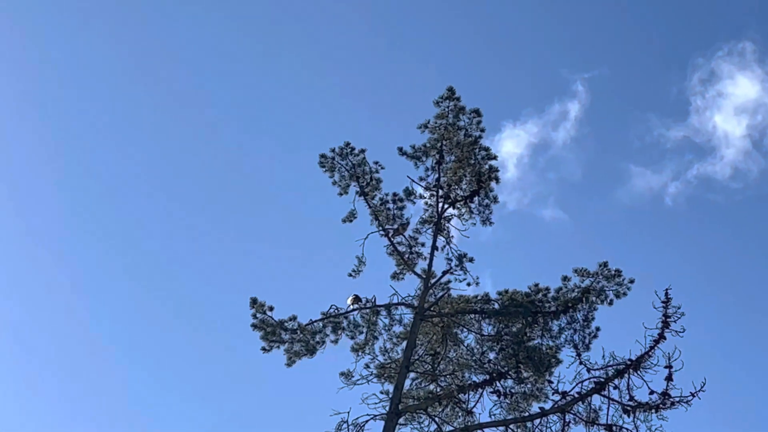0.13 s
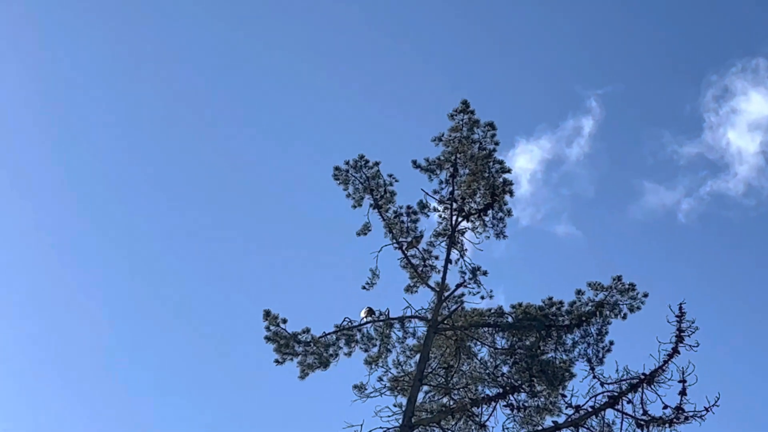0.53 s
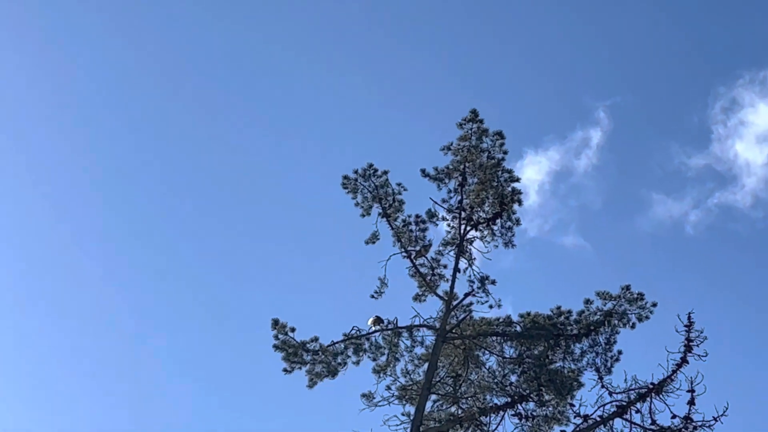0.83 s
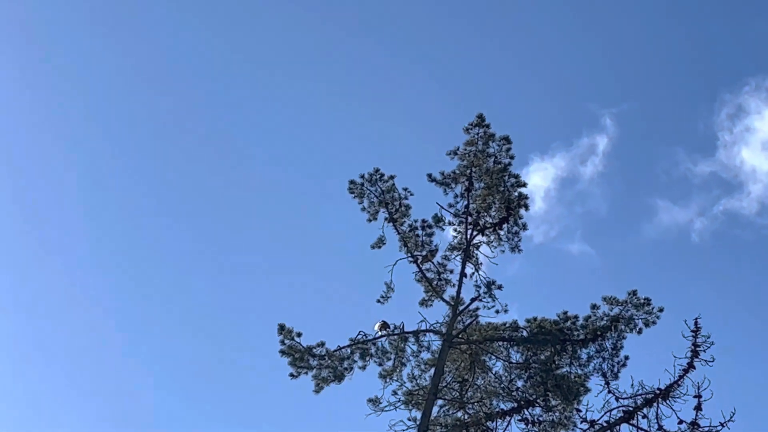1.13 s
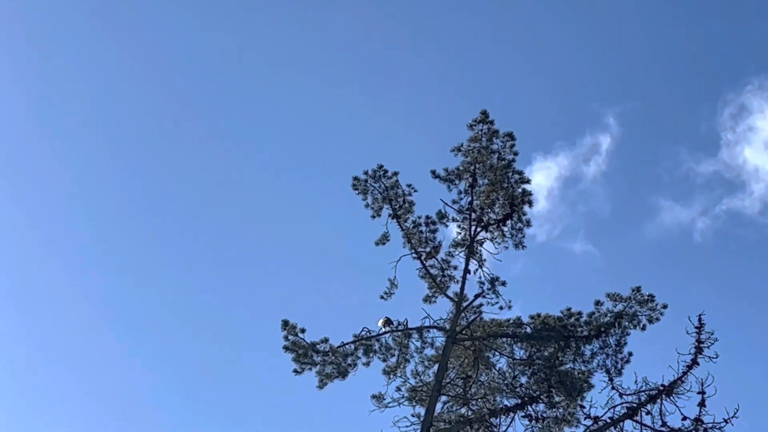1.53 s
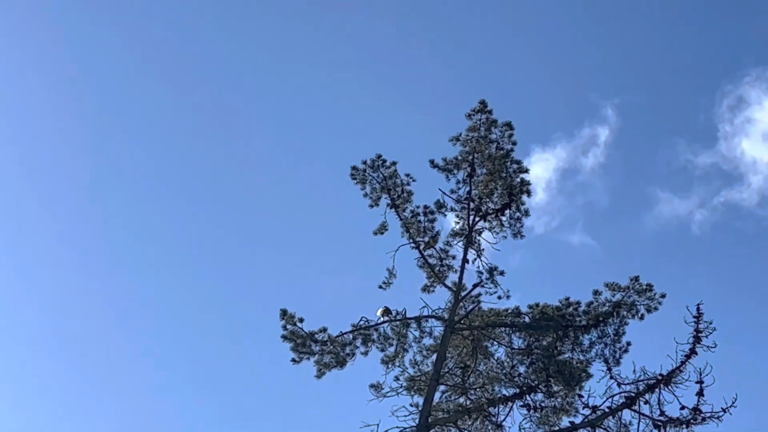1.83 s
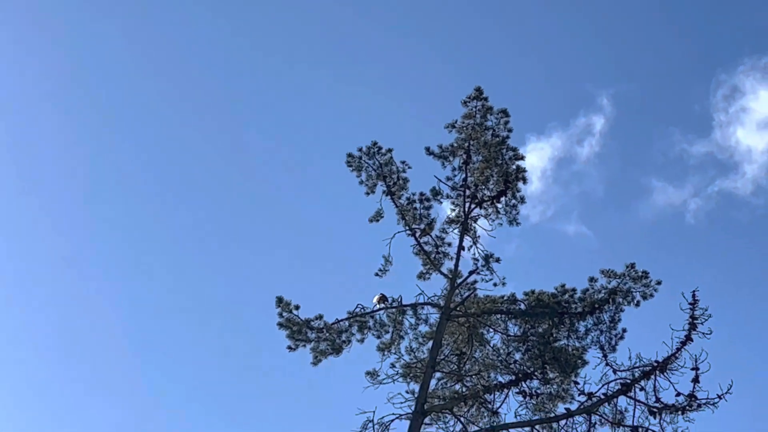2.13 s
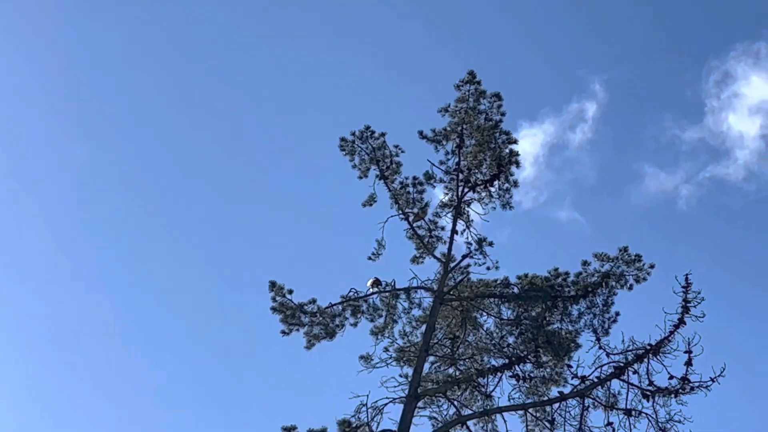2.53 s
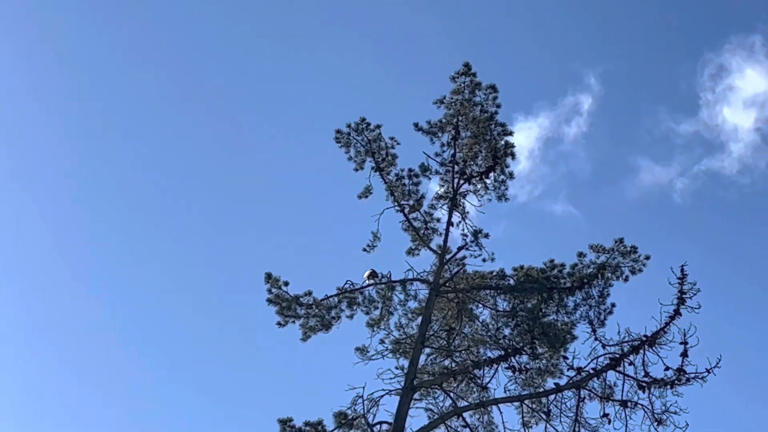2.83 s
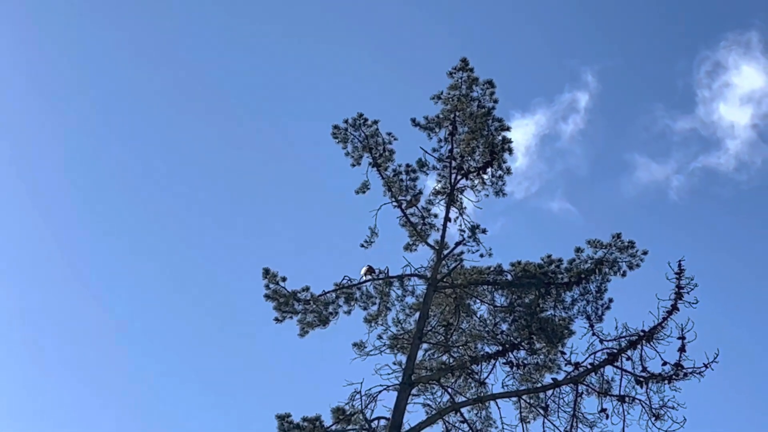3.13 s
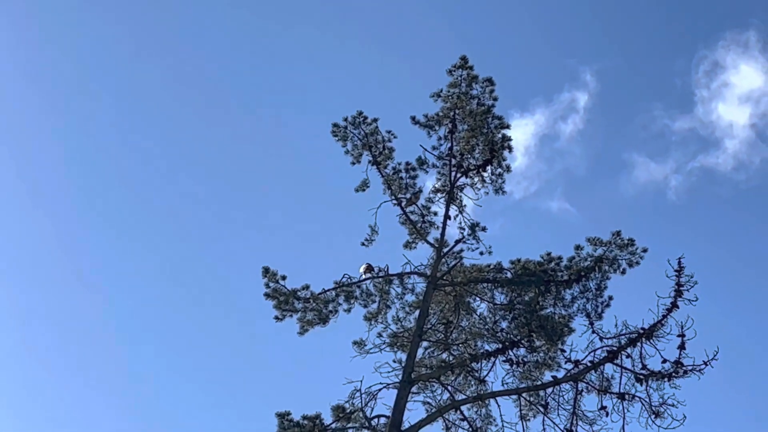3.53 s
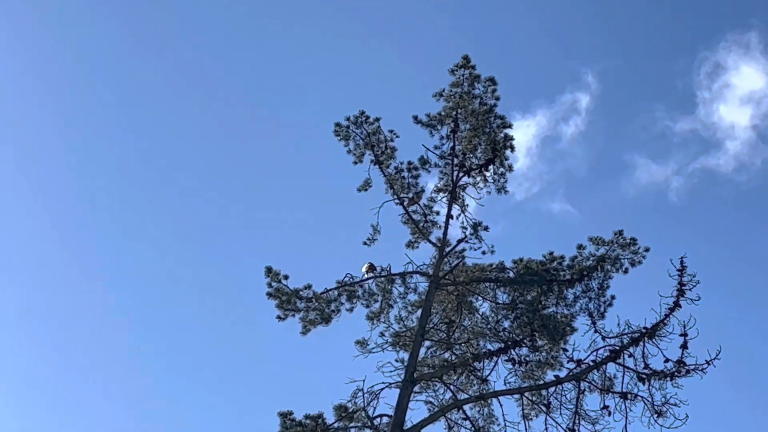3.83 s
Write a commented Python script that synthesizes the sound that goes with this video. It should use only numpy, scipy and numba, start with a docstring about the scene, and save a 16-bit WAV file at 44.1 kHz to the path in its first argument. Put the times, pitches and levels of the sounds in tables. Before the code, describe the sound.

A hawk high in a tree gives one long hoarse scream, rising sharply, breaking, then holding a rasping, slowly sagging tone. Low outdoor rumble and faint microphone hiss surround it; a short diffuse echo follows.

```python
"""Hawk scream from a high branch

A hawk slightly to the right gives one long hoarse scream: it shoots up, breaks and sags.
Its unsteady sine whistle is chopped by a slower flutter and buried in rasp, random clicks ringing in
resonances; short reflections and a diffuse tree echo answer it. Filtered noise makes the low outdoor
rumble with a few droning resonances, and the thin microphone hiss."""
import sys
import numpy as np
from scipy import signal
from scipy.fft import rfft, irfft
from scipy.io import wavfile
from scipy.ndimage import uniform_filter1d
from numba import njit

SR = 44100
rng = np.random.default_rng(int(sys.argv[2]) if len(sys.argv) > 2 else 0)


def put_to_file(sound):
    """Save the sound as 16-bit audio at rate SR, in the file named by the first command-line argument."""
    columns = np.atleast_2d(sound).T  # one column per channel
    safe = np.clip(columns, -1, 1)
    whole_steps = np.round(safe * 32767)
    wavfile.write(sys.argv[1], SR, whole_steps.astype(np.int16))


N = 176400  # samples, 4 s


def undb(db):
    """dB to gain."""
    return 10 ** (np.asarray(db) / 20)


def level(x, db):
    """Scale to an rms level over the whole length."""
    return x * undb(db) / np.sqrt(np.mean(x ** 2))


def follow(t, table, **ends):
    """Read a two-column curve at the times t, in straight lines between its points."""
    return np.interp(t, *np.array(table, float).T, **ends)


@njit
def svf(x, hz, width):
    """State-variable band-pass whose centre may move, gain 1 at the centre."""
    y, band_state, low_state = np.empty(len(x)), 0., 0.
    for i in range(len(x)):
        g, k = np.tan(np.pi * hz[i] / SR), width / hz[i]
        v = (band_state + g * (x[i] - low_state)) / (1 + g * (g + k))
        band_state = 2 * v - band_state
        low_state += 2 * g * v
        y[i] = k * v
    return y


def band(x, hz, width):
    """A steep resonance: the band-pass twice."""
    hz = hz + np.zeros(N)
    once = svf(x, hz, 1. * width)
    return svf(once, hz, 1. * width)


def colour(x, points):
    """Equalise a sound by (pitch_hz, level_db) points, joined on a log frequency axis."""
    hz, db = np.array(points, float).T
    bins_hz = np.arange(N // 2 + 1) * SR / N
    gain = undb(np.interp(np.log(bins_hz + 1), np.log(hz), db))  # + 1 avoids log 0
    return irfft(rfft(x) * gain, N)


def walk(rate):
    """Random wander with rms 1: noise smoothed twice over 1 / rate seconds."""
    k = max(int(SR / rate), 2)
    smooth = uniform_filter1d(uniform_filter1d(rng.standard_normal(N), k), k)
    return level(smooth, 0)


def turn(hz):
    """Phase in radians of a tone with moving pitch."""
    return 2 * np.pi * np.cumsum(hz) / SR


def left_right(mid, side):
    """Centre and side signals to a stereo pair."""
    return np.array([mid + side, mid - side])


HISS_HZ, HISS_WIDTH_HZ = 11060, 6000
HISS_DB, HISS_SIDE_DB = -95, -1.5  # centre level; side relative to centre


def hiss():
    """Thin high hiss of the microphone: a broad band of noise, separate in centre and side."""
    mid, side = (level(band(rng.standard_normal(N), HISS_HZ, HISS_WIDTH_HZ), HISS_DB + db)
                 for db in (0, HISS_SIDE_DB))
    return left_right(mid, side)


# droning resonances: pitch_hz, width_hz, level_db (before waver and swell)
DRONES = [(69, 21, -62.5), (83.6, 4.5, -64.5), (125.26, 9.7, -62), (206.1, 24, -59.5), (229.4, 18, -64),
          (319.3, 11, -66), (441.8, 30, -74)]
# swell of the drones together: time_s, level_db
DRONE_SWELL = [(0, 2), (.6, -2), (1.1, -1.5), (1.75, 7), (2.2, -3.5), (2.9, 2), (3.5, 0), (4, 4.5)]


def drones(t):
    """Narrow noise resonances that waver each on its own and swell together."""
    total = 0
    for hz, width, db in DRONES:
        drone = level(band(rng.standard_normal(N), hz, width), db)
        total = total + drone * undb(2.9 * walk(5.2))
    return total * undb(follow(t, DRONE_SWELL))


# spectral slope of the rumble, centre and side: pitch_hz, level_db (relative)
RUMBLE_MID = [(12, -62.5), (20, -18), (69, 1.5), (134, -9), (163, -10.5), (203, -3), (253, -8),
              (286, -15.5), (323, -12), (374, -20), (444, -28), (478, -27.5), (723, -31.5), (1240, -43),
              (6830, -63), (8880, -80), (15000, -120)]
RUMBLE_SIDE = [(12, -52), (20, -15), (54, 2), (184, -5.5), (219, -2.5), (403, -8), (433, -14), (553, -14),
               (1580, -21), (3200, -58.5), (6830, -42), (8880, -72), (15000, -120)]
# slow level of the centre rumble: time_s, level_db
GUST = [(0, 1), (.6, -0.5), (1.7, 0.5), (2.6, 0), (4, -0.5)]
RUMBLE_DB, RUMBLE_SIDE_DB = -49.5, -66.5  # centre before its slow level curve
FAR_HZ, FAR_WIDTH_HZ, FAR_DB = 1700, 410, -87


def rumble(t):
    """Broad low noise and a soft distant wash with the drones in the centre, steady noise at the side."""
    broad = level(colour(rng.standard_normal(N), RUMBLE_MID), RUMBLE_DB) * undb(follow(t, GUST))
    wash = level(band(rng.standard_normal(N), FAR_HZ, FAR_WIDTH_HZ), FAR_DB)
    side = level(colour(rng.standard_normal(N), RUMBLE_SIDE), RUMBLE_SIDE_DB)
    return left_right(broad + wash + drones(t), side)


# colour of the echo, centre and side: pitch_hz, level_db
ECHO_MID = [(500, -4), (1800, -7), (2100, -7), (2400, -3), (3000, -5), (3700, -5), (4500, 3), (7000, -3)]
ECHO_SIDE = [(500, 1.5), (1700, -2), (2500, -9), (3300, -5.5), (3800, -34.5), (5000, -32.5), (5500, -1),
             (7000, 5)]
ECHO_DB, ECHO_DELAY_S = -4, 0.017  # level before colouring
ECHO_T60_S, ECHO_TREBLE_T60_S, ECHO_SPLIT_HZ = 0.76, 0.48, 3600  # time to fall 60 dB, below and above the split
ECHO_CURVE = 1.5  # above 1 the echo holds, then falls ever faster
LEAF_DEPTH, LEAF_PER_S = .9, 200


def trees(bird):
    """Diffuse echo: the scream, smeared by moving needles, convolved with fading noise whose treble dies first."""
    t = np.arange(SR) / SR
    smeared = bird * (1 + LEAF_DEPTH * walk(LEAF_PER_S)) / np.hypot(1, LEAF_DEPTH)

    def fade(t60):
        return np.exp(-np.log(1000) * (t / t60) ** ECHO_CURVE) * (t > ECHO_DELAY_S)

    noise = rng.standard_normal((2, SR))
    dull = signal.sosfilt(signal.butter(4, ECHO_SPLIT_HZ, fs=SR, output="sos"), noise)
    tail = dull * fade(ECHO_T60_S) + (noise - dull) * fade(ECHO_TREBLE_T60_S)
    tail = tail / np.sqrt((tail ** 2).sum(axis=1)[:, None])
    mid, side = undb(ECHO_DB) * signal.fftconvolve(smeared[None], tail, axes=1)[:, :N]
    return left_right(colour(mid, ECHO_MID), colour(side, ECHO_SIDE))


# early reflections from ground and trunk: delay_ms, level_db
BOUNCES = [(3.1, -14), (4.3, -15), (8.24, -8), (11.3, -14), (12.07, -11)]


def reflections(bird):
    """Single delayed copies of the scream."""
    return sum(undb(db) * np.roll(bird, round(ms * SR / 1000)) for ms, db in BOUNCES)


# side share of the direct scream and its reflections, toward the right: pitch_hz, level_db
ASIDE = [(500, -30), (900, -16), (1400, -1.5), (2150, -3.5), (2600, -19), (3400, -26.5), (4200, -40),
         (5000, -40.5), (5600, -8), (8000, -27)]
SIDE_LAG = 3  # samples, between the microphone ports


def place(near):
    """Lean the near sound to the right with a coloured, slightly late side signal."""
    side = np.roll(colour(near, ASIDE), SIDE_LAG)
    return left_right(near, -side)


RASP_PER_S, RASP_SCATTER_DB = 9000, 2


def clicks():
    """Dense irregular clicks of either sign and scattered strength."""
    hits = rng.random(N) < RASP_PER_S / SR
    strength = undb(RASP_SCATTER_DB * rng.standard_normal(N))
    return hits * strength * rng.choice([-1., 1.], N)


def ring(resonances):
    """Rasp: clicks ringing in (pitch_hz, width_hz, relative level_db) resonances, rms 1 in all."""
    return level(sum(undb(db) * level(band(clicks(), hz, width), 0) for hz, width, db in resonances), 0)


SHRILL_DB, SHRILL_HZ, SHRILL_S, SHRILL_LENGTH_S = -79, 10000, 0.822, 0.057


def shrill_rasp(t):
    """A brief puff of very high rasp, peaking at SHRILL_DB."""
    puff = np.exp(-((t - SHRILL_S) / SHRILL_LENGTH_S) ** 2)
    return undb(SHRILL_DB) * puff * ring([(SHRILL_HZ, 2500, 0)])


UNDER_S, UNDER_LENGTH_S, UNDER_DB = .885, .09, -63.5  # start, length, peak amplitude
UNDER_FIRST_HZ, UNDER_LAST_HZ = 1033, 833
UNDER_TAIL_DB, UNDER_TAIL_S = -71, 0.17  # tail level before its fade, fade time constant


def undertone(t, ragged_hz):
    """A brief low falling sine at the break; a rasp tail slides on faintly below the pitch."""
    u = np.clip((t - UNDER_S) / UNDER_LENGTH_S, 0, 1)
    hz = (UNDER_FIRST_HZ + (UNDER_LAST_HZ - UNDER_FIRST_HZ) * u) * (1 + 0.0071 * walk(100))
    tone = undb(UNDER_DB) * np.sin(np.pi * np.sqrt(u)) * np.sin(turn(hz))
    late = t - UNDER_S - UNDER_LENGTH_S / 2
    fade = np.clip(late / 0.018, 0, 1) * np.exp(-np.maximum(late, 0) / UNDER_TAIL_S)
    return tone + undb(UNDER_TAIL_DB) * fade * ring([(0.32 * ragged_hz, 60, 0)])


# rasp at thirds of the pitch: thirds, width_hz, level_db (relative)
THIRDS = [(1, 650, 1), (2, 200, -2)]
# level of the low rasp: time_s, level_db
LOW_RASP = [(.73, -75.5), (.765, -62), (.84, -84.5), (.9, -75.5), (1.0, -72.5), (1.8, -70.5), (2.7, -75)]


def low_rasp(t, hz):
    """Rasp ringing at one and two thirds of the whistle pitch."""
    return undb(follow(t, LOW_RASP)) * ring([(k * hz / 3, width, db) for k, width, db in THIRDS])


# higher strand that arches with the pitch while the scream opens: time_s, pitch_hz, level_db
STRAND = [(.76, 4580, -90), (.79, 5020, -64), (.83, 5800, -57.5), (.86, 5360, -65.5), (.885, 4740, -66.5),
          (.93, 4600, -90)]


def high_strand(t):
    """A narrow rasp resonance that arches above the opening scream."""
    s, points_hz, points_db = np.array(STRAND, float).T
    gain = undb(np.interp(t, s, points_db, -150, -150))
    return gain * ring([(np.interp(t, s, points_hz), 350, 0)])


# level of the windpipe resonance: time_s, level_db
HELD = [(.738, -63.5), (.76, -56), (.8, -68.5), (.86, -65), (.9, -59.5), (.96, -56.5), (1.03, -61),
        (1.09, -72)]
HELD_HZ, HELD_WIDTH_HZ = 2410, 170


def held_windpipe(t):
    """A windpipe resonance that holds its pitch under the arch and the break."""
    return undb(follow(t, HELD, right=-150)) * ring([(HELD_HZ, HELD_WIDTH_HZ, 0)])


OPEN_HZ, OPEN_WIDTH_HZ, OPEN_DB = 3800, 200, -68  # level at full opening


def open_beak(wide):
    """A resonance heard while the beak is wide open."""
    return undb(OPEN_DB) * wide * ring([(OPEN_HZ, OPEN_WIDTH_HZ, 0)])


# overtone resonances gliding through the scream: start_hz, end_hz, width_hz, level_db (relative)
BEAK = [(4955, 4480, 860, 2.5), (4030, 4700, 1200, -5.5), (5790, 6100, 500, -8.5), (6800, 4400, 540, -15)]
OPEN_DUCK_DB = -7  # these are weaker while the beak is wide open
OVERTONE_WIDTH_HZ = 1800


def overtones(t, hz, span, wide):
    """Rasp in gliding beak resonances, plus rasp following the pitch from above."""
    gliding = [(np.interp(t, span, [first, last]), width, db) for first, last, width, db in BEAK]
    beak = undb(OPEN_DUCK_DB * wide) * ring(gliding)
    return beak + undb(-6.5) * ring([(1.32 * hz, OVERTONE_WIDTH_HZ, -2), (1.8 * hz, 600, -8)])


# resonances of windpipe and beak: pitch_hz, width_hz, level_db (relative)
THROAT = [(2417, 110, -2.5), (2529, 130, -3.5), (2663, 140, -8), (2917, 464, -5)]
THROAT_WANDER, THROAT_WANDER_PER_S = .012, 12  # rms share of the pitch, rate
GLIDE_WIDTH_HZ, GLIDE_DB = 740, -3.5


def throat_rasp(hz):
    """Rasp in throat resonances that wander a little, and gathered round the gliding pitch."""
    throat = [(f * (1 + THROAT_WANDER * walk(THROAT_WANDER_PER_S)), width, db) for f, width, db in THROAT]
    return ring(throat + [(0.953 * hz, GLIDE_WIDTH_HZ, GLIDE_DB)])


WOBBLE_SHARE, WOBBLE_PER_S = .014, 200  # rms share of the pitch, rate
HOARSE_WIDTH_HZ, PURE_DB = 200, -5  # PURE_DB: middle level of the sine against the hoarse band


def breathy_whistle(ragged_hz):
    """An unsteady sine with a hoarse band of rasp at the same pitch."""
    sine = np.sin(turn(ragged_hz * (1 + WOBBLE_SHARE * walk(WOBBLE_PER_S))))
    pure = np.sqrt(2) * undb(PURE_DB + 2.5 * walk(90)) * sine
    return pure + ring([(ragged_hz, HOARSE_WIDTH_HZ, 0)])


FLUTTER_HZ, FLUTTER_JITTER, FLUTTER_DEPTH = 404.3, 0.12, 0.45  # mean rate, rms share of rate, depth


def throat_flutter():
    """An irregular fast tremolo that chops the voice."""
    return 1 + FLUTTER_DEPTH * np.cos(turn(FLUTTER_HZ * (1 + FLUTTER_JITTER * walk(57.9))))


# the scream, before flutter and radiation:
# time_s, whistle_pitch_hz, rasp_level_db, whistle_level_db, overtone_level_db
SCREAM = [(.738, 2200, -63.5, -64.5, -89.5), (.756, 2750, -55, -58, -69), (.78, 3249, -58, -53, -58),
          (0.819, 3500, -57.5, -59, -56.5), (.865, 3450, -60.5, -59.5, -55),
          (.875, 3150, -57.5, -50, -56.5), (.925, 2920, -51.5, -56.5, -65.5),
          (.95, 2480, -49.5, -56.5, -67.5), (1.03, 2380, -53.5, -58.5, -63.5),
          (1.059, 2130, -53, -62, -68.5), (1.18, 2150, -54.5, -57.5, -71), (1.451, 2130, -55, -56.5, -73),
          (1.797, 2130, -55.5, -55.5, -73.5), (2.101, 2120, -56.5, -56, -71.5),
          (2.35, 2110, -57, -55.5, -72), (2.598, 2060, -58, -57.5, -73), (2.732, 2040, -59, -57.5, -74),
          (2.759, 2040, -61, -70.5, -77)]
# how the open beak radiates the voice: pitch_hz, level_db
RADIATE = [(500, 9.5), (1450, -2.5), (1640, -18), (1760, -0.5), (1850, -6.5), (2000, 0), (3300, -4),
           (3700, -3), (4200, -1.5), (6700, -2.5), (7100, -7.5)]
ATTACK_S, RELEASE_S = .013, .008
BREAK_WOBBLE, BREAK_S, BREAK_LENGTH_S = .04, 1.0, .12  # most ragged just after the break
OPEN_S, OPEN_LENGTH_S = .85, .08  # beak wide open: centre, half-width


def hawk(t):
    """Fluttering whistle and throat rasp, with overtones, radiated by the beak; low and shrill parts added."""
    s, *columns = np.array(SCREAM, float).T
    hz, rasp_db, whistle_db, over_db = (np.interp(t, s, column) for column in columns)
    attack = np.clip((t - s[0]) / ATTACK_S + 1, 0, 1)
    release = np.clip((s[-1] - t) / RELEASE_S + 1, 0, 1)
    shape = attack * release
    near_break = np.exp(-((t - BREAK_S) / BREAK_LENGTH_S) ** 2)
    ragged_hz = hz * (1 + BREAK_WOBBLE * near_break * walk(116))
    wide = np.exp(-((t - OPEN_S) / OPEN_LENGTH_S) ** 4)
    flutter = throat_flutter()  # shared by whistle and rasp
    voice = undb(rasp_db) * flutter * throat_rasp(hz)
    voice += undb(whistle_db) * flutter * breathy_whistle(ragged_hz)
    voice += undb(over_db) * overtones(t, hz, s[[0, -1]], wide)
    voice += high_strand(t) + open_beak(wide) + held_windpipe(t)
    radiated = colour(shape * voice, RADIATE)
    return radiated + shape * low_rasp(t, hz) + shrill_rasp(t) + undertone(t, ragged_hz)


def scene():
    """Hiss, rumble and tree echo behind the bird with its reflections."""
    t = np.arange(N) / SR
    bird = hawk(t)
    return hiss() + rumble(t) + trees(bird) + place(bird + reflections(bird))


TOP_HZ = 13100


def record(dry):
    """The microphone dips near 8 kHz; a steep low-pass cuts the top."""
    # pitch_hz, level_db
    mic = [(20, -4.5), (6500, 0), (7500, 2.5), (8300, -30.5), (9100, -2.0), (10000, -4.5), (20000, 0.5)]
    wet = np.array([colour(channel, mic) for channel in dry])
    return signal.sosfilt(signal.ellip(8, .2, 60, TOP_HZ, fs=SR, output="sos"), wet)


dry = scene()
out = record(dry)
put_to_file(out)
```